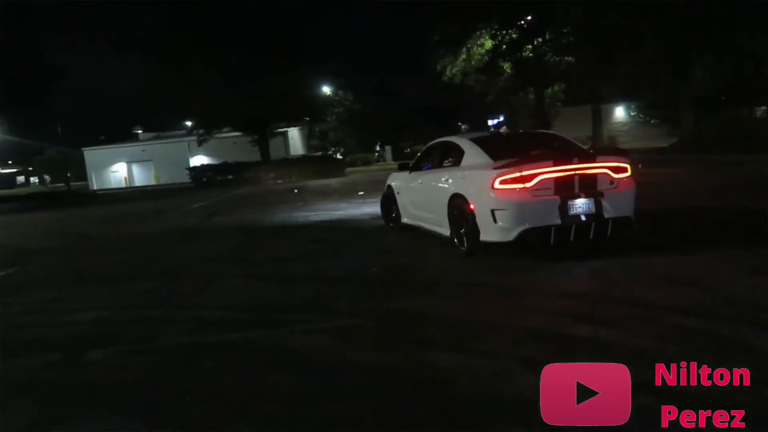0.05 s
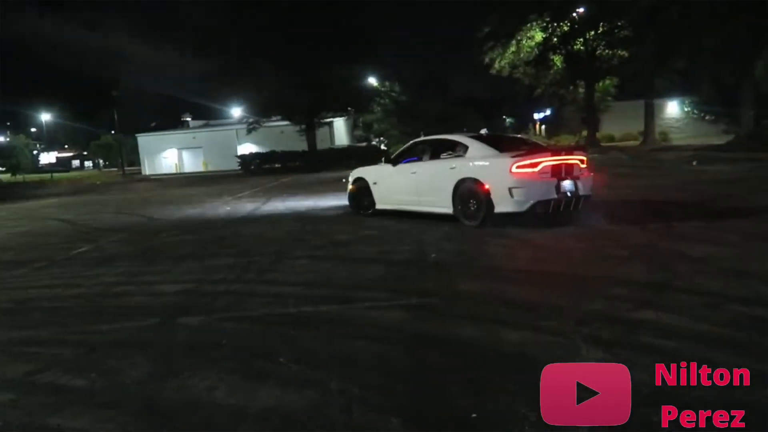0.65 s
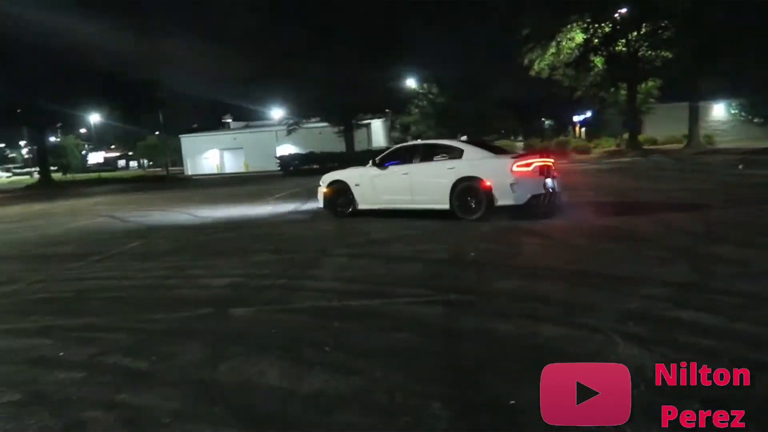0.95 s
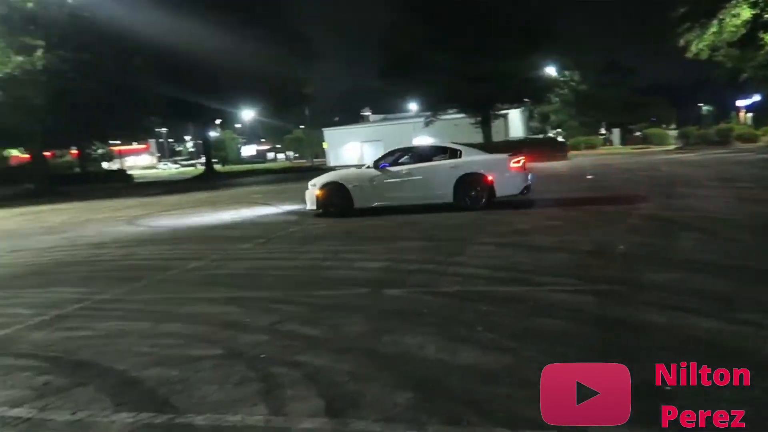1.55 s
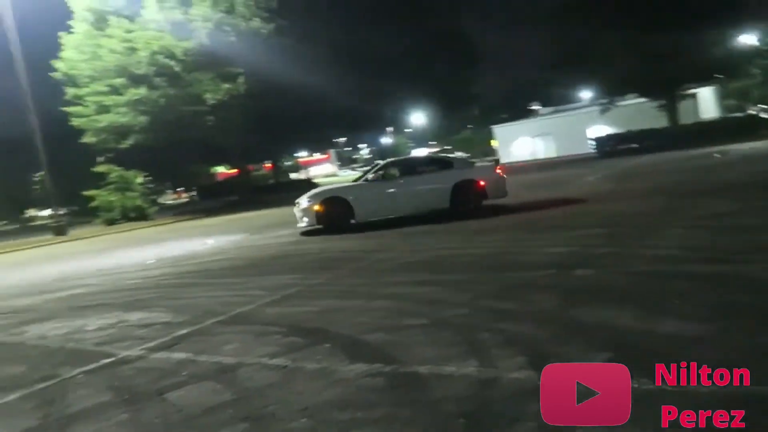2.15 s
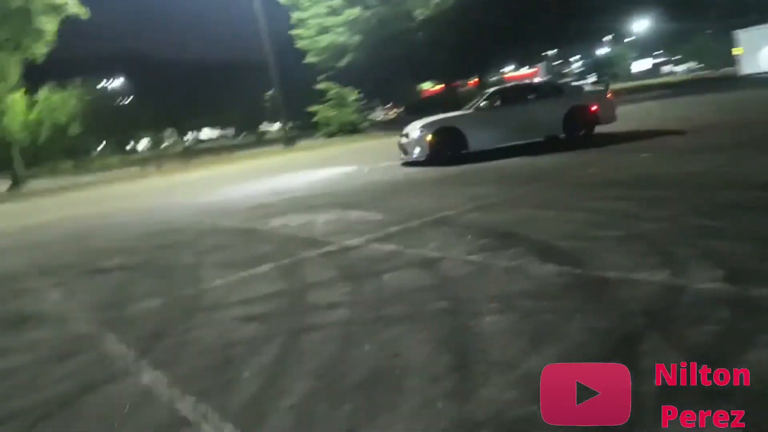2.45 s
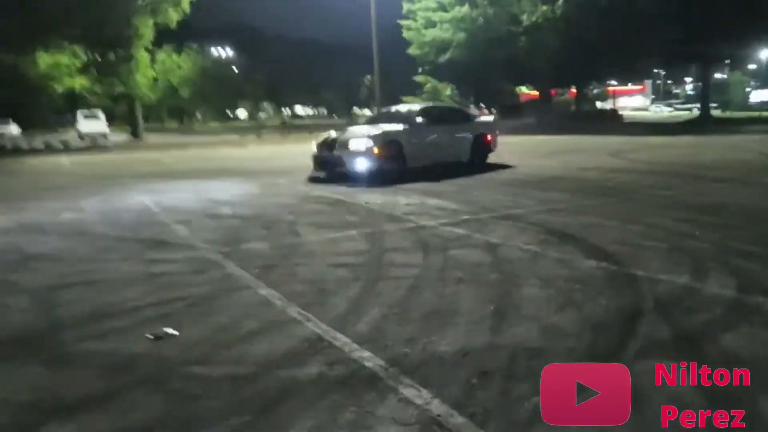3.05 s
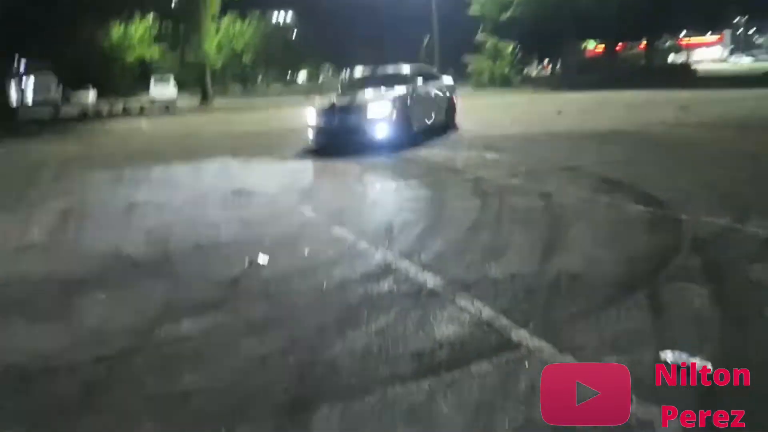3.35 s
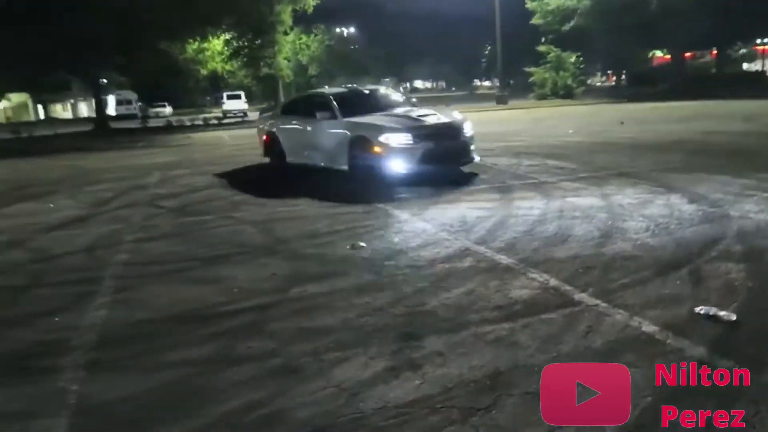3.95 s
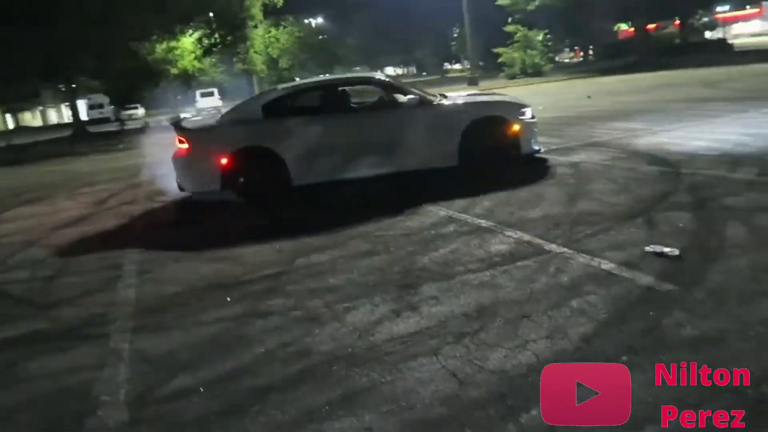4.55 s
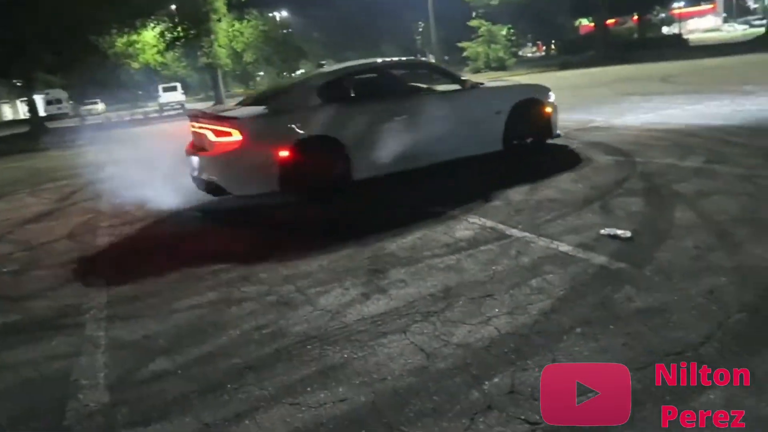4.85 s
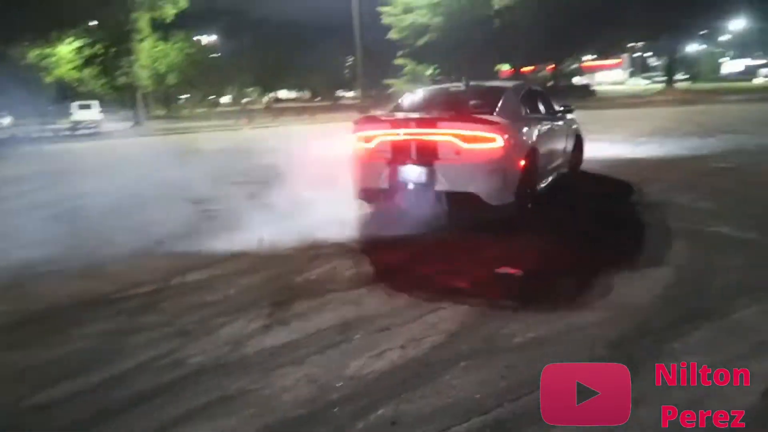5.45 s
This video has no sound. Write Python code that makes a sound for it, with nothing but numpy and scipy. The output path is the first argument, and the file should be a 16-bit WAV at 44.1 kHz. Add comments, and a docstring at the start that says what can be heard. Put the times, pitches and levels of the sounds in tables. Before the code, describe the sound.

Heard from close by in an open asphalt lot, a powerful car engine barks, drops to a low burble and surges three more times. From the second surge on, spinning tyres screech with a wavering pitch, breaking into stuttering chirps and rough rubber scrub. Near the end the tailpipes swing past, rasping and howling, then the engine eases and the squeal fades. Tight reflections and a faint night hush lie underneath.

```python
"""A V8 car spins a donut on asphalt at night, a few metres away, in four bursts of throttle.
First its uneven firing pulses ring the exhaust pipes from behind; the revs sag, then climb on the far flank.
From about 2 s the rear tyres squeal and scrub in stick-slip friction, and the nose comes round on the
third burst. On the fourth, from 3.7 s, the near flank passes, then the tail swings close by with a rasp
of gas and a howl before the throttle shuts. Throughout, buildings round the lot answer."""
import sys
import numpy as np
from scipy import signal
from scipy.fft import rfft, irfft, next_fast_len
from scipy.io import wavfile
from scipy.ndimage import uniform_filter1d, map_coordinates

SR = 44100
rng = np.random.default_rng(int(sys.argv[2]) if len(sys.argv) > 2 else 0)


def store_pcm(level_fs):
    """Save levels as 16-bit WAV."""
    pcm = np.round(np.clip(level_fs, -1, 1) * 32767).astype(np.int16)
    wavfile.write(sys.argv[1], SR, np.atleast_2d(pcm).T)


N = 246959

# level laws of the exhaust layers, before each layer's trim:
# shut_db, per_doubling_db, load_exponent, behind_db, flank_db, front_db, close_db, tail_db
BARK_LAW = (-33.5, 14.5, 1.08, -17.5, -19.7, -18.3, -17.5, -18.5)
CRACK_LAW = (-46.5, 16, 5, -34, -29, -36.5, -38, -36.5)
RASP_LAW = (-48, 20.5, 2, -22, -40.5, -40.5, -41, -40.5)
HISS_LAW = (-65, 24.5, 15, -35, -62, -54.5, -52, -59)
# the exhaust flares up, most as a tailpipe sweeps past:
# centre_s, half_length_s, bark_db, crack_db, rasp_db, hiss_db, howl_gain
FLARES = [(1.605, 0.1, 0.5, 5, 6.5, 11.5, 0), (2, 0.15, -2, 6.5, -0.5, 4, 0.044),
          (2.663, 0.057, 1, 2.5, -2, 1, 0.023), (2.897, 0.2, 0, 9, 7.5, 11.5, 0.11),
          (4.717, 0.083, 3, -4, -1, -3.5, 0.14), (4.937, 0.14, 1, 7, 19.5, 12, 0.088),
          (5.336, 0.092, 0.5, 6.5, 15, -6, 0.97)]


def exhaust(cycle, car, howl_hz=777, howl_width_hz=120, muffler_hz=440):
    """Direct and reflected sound: pulses are sharp under load, blurred when screened or off throttle."""
    _, load, angle, shares = car
    flares = sum(np.outer(rises, burst(s, half)) for s, half, *rises in FLARES)
    bark_up, crack_up, rasp_up, hiss_up, howl = flares
    screened = swell(angle, 250.7, 14.7)  # degrees at which the body hides the tailpipes
    reflected = np.clip(0.15 + 0.78 * (1 - load) + 0.63 * screened, 0, 1)
    blur = lambda x: np.sqrt(1 - reflected) * x + np.sqrt(reflected) * echoes(x)
    bark, crack, puffs = pipe_resonance(cycle, shares)
    bark += howl * filtered(bark, lambda hz: 1 / (1 + 2j * (hz - howl_hz) / howl_width_hz))
    bark = filtered(bark, lambda hz: 1 - 1 / (1 + (hz / muffler_hz) ** 6))
    bark = amp(level(BARK_LAW, car) + bark_up - 2.5 * screened - 0.5) * blur(bark)
    crack = amp(level(CRACK_LAW, car) + crack_up - 5) * blur(crack)
    flow = np.sqrt((1 - reflected) * unit(puffs + 0.58) ** 2 + reflected)
    gas = gas_jet(flow, level(RASP_LAW, car) + rasp_up, level(HISS_LAW, car) + hiss_up, shares)
    return bark + crack + gas


# the eight firings of a cycle as heard from each side: place_intervals, size_db
FIRING_BEHIND = [(7.18, 1.6), (0.59, 1.1), (1.229, -4.5), (2.007, -2.5), (2.59, 0.5), (4.14, 1.3),
                 (5.05, -14), (6.1, -7.5)]
FIRING_FLANK = [(7.57, 6), (0.865, -5), (1.96, -6), (2.69, 7), (2.8, -13), (4.62, -2.5), (5.6, -11),
                (7.5, -13)]
FIRING_FRONT = [(7.4, 2.5), (0.34, -12), (1.586, -4), (2.58, 8.5), (2.98, -14), (4.45, 0.5), (5.31, 1),
                (7.02, -5)]
FIRING_CLOSE = [(7.23, -3), (0.82, -4), (1.753, -4), (2.6, -9), (3.36, -2.5), (3.57, -0.5), (5.24, -7.5),
                (6.44, -3)]
FIRING_TAIL = [(0.05, 1), (0.94, -4.5), (1.58, -0.5), (3.18, 4.5), (4.03, -3), (4.78, -0.5), (5.64, -13.5),
               (6.58, 1.8)]
# pipe response towards each side: frequency_hz, gain_db
PIPE_BEHIND = [(250, -27), (360, -4.5), (420, -13), (490, -18.5), (570, -1), (650, -7), (750, 3.5),
               (870, -2.5), (970, 0), (1100, -12), (1600, -7.5), (2300, -23), (2850, -29.5), (3300, -22),
               (3700, -32), (5000, -32.5), (12000, -56.5)]
PIPE_FLANK = [(250, -3.5), (370, -0.5), (490, -8.5), (570, -1), (750, 1), (870, 1.5), (970, 0.5),
              (1080, -4.5), (1180, -14), (1450, 1.5), (1600, -6.5), (1920, -16.5), (2300, -9),
              (2550, -22.5), (3000, -23), (12000, -62.5)]
PIPE_FRONT = [(250, -18.5), (490, -12), (570, 1), (650, 0.5), (750, -1.5), (870, -4), (970, -8),
              (1100, -13.5), (1350, -9), (1800, -16.5), (2100, -16.5), (2500, -21.5), (3000, -22),
              (4000, -48), (7000, -46), (12000, -61)]
PIPE_CLOSE = [(250, -18.5), (420, -1), (490, -1), (570, 2), (650, -0.5), (750, -7), (870, -18), (970, -6.5),
              (1090, -3.5), (1400, -14.5), (1900, -16.5), (2400, -22.5), (3250, -21), (3800, -34),
              (5000, -40.5), (12000, -70)]
PIPE_TAIL = [(250, -18), (360, -5), (490, -1.5), (570, 4.5), (650, 2), (750, -3), (870, -8.5), (970, -11),
             (1100, -5), (1300, -11), (1600, -16.5), (2300, -22.5), (3250, -16.5), (3800, -30),
             (5000, -36.5), (12000, -61)]


def pipe_resonance(cycle, shares, split_hz=1200, puff_s=0.0017):
    """Source and filter: pulses ring the pipes in a low bark and a high crack, and drive puffs of gas."""
    patterns = FIRING_BEHIND, FIRING_FLANK, FIRING_FRONT, FIRING_CLOSE, FIRING_TAIL
    pipes = PIPE_BEHIND, PIPE_FLANK, PIPE_FRONT, PIPE_CLOSE, PIPE_TAIL
    unit_in_band = lambda x, lo, hi: x / rms(filtered(x, lambda hz: (hz > lo) & (hz < hi)))
    puff_decay = np.exp(-np.arange(SR // 40) / SR / puff_s)
    bark, crack, puffs = np.zeros((3, N))
    for weight, pattern, pipe in zip(np.sqrt(shares), patterns, pipes):
        pulses = firings(cycle, pattern, scatter_db=1.2, jitter=0.009)
        # dispersion: the pipe delays the bass of each pulse behind its treble
        tone = signal.lfilter([-.88, 1], [1, -.88], ring(pulses, pipe))
        body = filtered(tone, lambda hz: 1 / (1 + (hz / split_hz) ** 8))
        bark += weight * unit_in_band(body, 480, 780)
        crack += weight * unit_in_band(tone - body, 1300, 1600)
        # the hardest pulses tear off far more noise
        puffs += weight * unit(signal.fftconvolve(pulses ** 2, puff_decay)[:N])
    return bark, crack, puffs


def firings(cycle, pattern, scatter_db, jitter):
    """Cycle-to-cycle variation: one pressure pulse per firing, each a little off in size and time."""
    place, db = np.transpose(pattern)
    chance = rng.standard_normal((SR // 200, len(place), 2))
    due = np.arange(len(chance))[:, None] + (place + jitter * chance[..., 0]) / len(place)
    at = np.interp(due.ravel(), cycle, np.arange(N))
    size = amp(db + scatter_db * chance[..., 1]).ravel() * (at < N - 1)
    first, part = at.astype(int), at % 1  # each pulse is shared between two samples
    return (np.bincount(first, size * (1 - part), N + 1) + np.bincount(first + 1, size * part, N + 1))[:N]


# gas noise at the pipe mouths and low rumble of the jet: frequency_hz, density_db
RASP_SPECTRUM = [(900, -35), (1800, -4.5), (2500, -5), (2900, -2.5), (3250, -3), (3550, -7), (3850, -5),
                 (4400, -14), (6500, -22), (10000, -51)]
HISS_SPECTRUM = [(2500, -20), (4500, 2.5), (6200, 1.5), (8000, -3), (12000, -9.5), (13500, -32),
                 (15500, -47)]
RUMBLE_SPECTRUM = [(20, 10), (50, 8), (75, 9), (120, 8.5), (250, 5), (600, -43)]


def gas_jet(flow, rasp_db, hiss_db, shares, spacing_hz=256, bounce=0.18, tip_hz=3320):
    """Turbulence: pulsing gas noise bounces in the open pipe, which rings at evenly spaced pitches."""
    gas = flow * (amp(rasp_db - 3) * noise(RASP_SPECTRUM) + amp(hiss_db + 1) * noise(HISS_SPECTRUM))
    gas = filtered(gas, lambda hz: 1 / (1 - bounce * np.exp(-2j * np.pi * hz / spacing_hz)))
    # the steel tips and the jet are heard most when they point at the listener
    behind, _, _, close, tail = shares
    tips = unit(filtered(flow * rng.standard_normal(N), lambda hz: 1 / (1 + ((hz - tip_hz) / 170) ** 2)))
    tips *= amp(rasp_db - 5) * (behind + 0.66 * (close + tail))
    rumble = amp(hiss_db - 7.5 + 3.9 * behind) * noise(RUMBLE_SPECTRUM)
    return gas + tips + rumble


# level laws of orders 3, 5, 8 and the weaker ones, ahead of the mufflers: columns as in BARK_LAW
THIRD_LAW = (-48.5, 15.5, 3, -49, -39.5, -31, -45.5, -51)
FIFTH_LAW = (-39, 20.5, 1, -35.5, -31, -28, -26, -30)
EIGHTH_LAW = (-44.5, 16, 1.6, -32, -29.5, -29.5, -34, -43.5)
WEAK_LAW = (-45, 23.5, 0.3, -27, -32.5, -34, -28, -27)
# weaker orders against their law: order, behind_db, flank_db, front_db, close_db, tail_db
WEAK_ORDERS = [(4, -21, -24, -17, -14.5, -18.5), (6, -15.5, -6.5, -8.5, -14, -10),
               (7, -12, -10.5, -21, -18.5, -6.5), (9, -2.5, -3, -7.5, -2, -4),
               (10, -9.5, -5, -7, -14.5, -14), (11, -16, -2, -6.5, -9, -4)]
# single orders sing out in the pipes as the car turns:
# order, centre_s, half_length_s, level_db (at the peak, before the trim)
SINGING_ORDERS = [(16, 1.365, 0.16, -28), (11, 1.54, 0.082, -39), (24, 1.6, .17, -28),
                  (18, 2.82, 0.085, -25.5), (19, 3.93, .15, -24.5), (20, 3.6, 0.13, -29),
                  (17, 4.32, 0.15, -21), (17, 4.3, 0.15, -24.5), (19, 4.83, .08, -22),
                  (16, 5.29, 0.083, -20.5), (17, 5.45, 0.049, -20.5), (21, 5.4, 0.13, -24.5),
                  (16, 0.13, 0.31, -20)]
# muffler response: frequency_hz, gain_db
MUFFLER = [(75, 1), (105, -14), (128, -9), (150, -6.5), (176, -4), (198, 0), (235, -3), (256, 2.5),
           (287, 4), (318, 1), (365, -0.5), (410, 2), (455, -1)]


def muffler_drone(cycle, car, hollow_hz=372):
    """Forced resonance: orders, the multiples of the cycle rate, boom as they pass the mufflers' notes."""
    cycle_hz, _, _, shares = car
    place, size_db = np.transpose(FIRING_FLANK)

    def order(k, db, waver_db=1.5):
        """Harmonic k, slightly unsteady, takes its phase from the firing pattern."""
        lead = np.angle(np.sum(amp(size_db) * np.exp(-2j * np.pi * k * place / len(place))))
        gain = amp(db + along(MUFFLER, k * cycle_hz) + waver_db * wobble(14))
        return np.sqrt(2) * gain * np.cos(2 * np.pi * k * cycle + lead + 0.16 * wobble(25))

    # the uneven banks favour the fifth
    boom = sum(order(k, level(law, car)) for k, law in ((3, THIRD_LAW), (5, FIFTH_LAW), (8, EIGHTH_LAW)))
    weak_db = level(WEAK_LAW, car)
    for k, *side_db in WEAK_ORDERS:
        boom += order(k, weak_db + np.array(side_db) @ shares, waver_db=3)
    for k, s, half, db in SINGING_ORDERS:
        boom += amp(db + 1.5) * burst(s, half) * np.cos(2 * np.pi * k * cycle)
    for k in range(12, 18):  # at low revs these sweep through the muffler's hollow note
        boom += order(k, weak_db - 2.5, waver_db=4) / (1 + ((k * cycle_hz - hollow_hz) / 30) ** 2)
    return boom + amp(-31) * echoes(boom)


# colour of the snap: frequency_hz, gain_db
SNAP_SPECTRUM = [(600, -34), (1400, 4), (1900, -0.5), (2600, -5.5), (4500, -11), (9000, -33.5)]


def exhaust_snap(cycle, car, place=0.275, level_db=-34.5):
    """Directivity: from straight behind, under load, one firing a cycle arrives as a hard, thin crack."""
    _, load, _, shares = car
    shocks = firings(cycle, [(place, 0)], scatter_db=2, jitter=0.006)
    return amp(level_db) * load ** 4 * shares[0] * unit(ring(shocks, SNAP_SPECTRUM))


# engine speed in four-stroke cycles: time_s, cycle_hz
ENGINE_SPEED = [(0.0, 39.98), (0.2, 41.78), (0.31, 42.21), (0.5, 40.06), (0.6, 38.21), (0.93, 25.43),
                (1.15, 22.27), (1.32, 24.26), (1.5, 28.75), (1.68, 32.92), (1.78, 33.88), (1.92, 35.19),
                (2.07, 36.88), (2.35, 30.82), (2.52, 29.58), (2.72, 37.1), (2.94, 45.51), (3.1, 47.29),
                (3.33, 45.41), (3.69, 35.57), (4.01, 39.92), (4.23, 39.7), (4.52, 36.18), (4.7, 34.31),
                (4.8, 36.51), (5.0, 41.58), (5.09, 40.63), (5.23, 38.26), (5.42, 38.6), (5.6, 34.77)]
# bursts of throttle: open_s, rise_s, shut_s, fall_s
THROTTLE = [(-0.4, 0.3, 0.52, 0.2), (1.12, 0.32, 2.076, 0.22), (2.43, 0.17, 2.87, 0.27),
            (3.68, 0.11, 5.445, 0.33)]
# the car's turn, from 0 with its tail to the listener: time_s, angle_deg
TURN = [(0, -1.5), (0.55, 19.5), (1.15, 81.5), (2.1, 93), (2.55, 177), (3.25, 183.5), (3.8, 241),
        (4.3, 258.5), (4.65, 271.5), (5.08, 269.5), (5.24, 332), (5.6, 334)]
# where each side is heard (behind, far flank, front, close flank, tail close by): angle_deg
SIDE_ANGLES = [0, 90, 180, 270, 330]


def driving(scattered_share=0.01):
    """A rotating directional source: engine speed, load 0-1, angle and the share heard of each side."""
    t = np.arange(N) / SR
    load = sum(np.clip(np.minimum((t - opens) / rise, 1 - (t - shuts) / fall), 0, 1)
               for opens, rise, shuts, fall in THROTTLE)
    load = np.clip(uniform_filter1d(load, size=SR // 14), 0, 1)
    cycle_hz, = curves(ENGINE_SPEED)
    angle, = curves(TURN)
    facing = np.array([np.interp(angle, SIDE_ANGLES, side) for side in np.eye(len(SIDE_ANGLES))])
    shares = facing + scattered_share
    return cycle_hz, load, angle, shares / shares.sum(0)


def level(law, car, cruise_hz=36):
    """Level law in dB: it follows engine speed with the throttle shut, the side heard with it open."""
    cycle_hz, load, _, shares = car
    shut_db, per_doubling_db, load_exponent, *open_db = law
    push = load ** load_exponent
    coasting_db = shut_db + per_doubling_db * np.log2(cycle_hz / cruise_hz)
    return (1 - push) * coasting_db + push * (np.array(open_db) @ shares)


# sliding rear tyres: time_s, pitch_hz, squeal_db, second_mode_relative_db, scrub_db
SQUEAL = [(1.9, 998, -66, -12, -57), (2.17, 947.3, -30, -12, -40.5), (2.3, 957, -36, -10, -38),
          (2.5, 931.6, -29, -7, -33), (3.05, 836.6, -31, -13, -31.5), (3.3, 863, -28, -11.5, -31.5),
          (3.89, 794, -28.5, -11.5, -31.5), (3.91, 1041, -26, -10, -24), (4.2, 1039, -25.5, -5.5, -25.5),
          (4.58, 965, -26.5, -10, -27.5), (4.85, 1041, -32, -18, -26.5), (5.1, 1081, -22, -18, -28),
          (5.3, 1050, -29, -18, -35), (5.6, 1000, -53, -4, -48)]
# the tyres lose their grip and fall quiet: centre_s, half_length_s, change_db
GRIP_LOSSES = [(4.325, 0.028, -9.5), (4.58, 0.026, -26)]
# tearing rubber: frequency_hz, density_db
SCRUB_SPECTRUM = [(150, -21), (400, -22), (900, 8), (1250, 2), (2200, -3), (4000, -16), (9000, -40.5)]


def tyre_squeal(wander=0.036, flutter=0.0222, spread=0.042, second_ratio=1.91, upper_hz=1260):
    """Stick-slip oscillation: tread patches slip at their own unsteady pitches, over a rubber scrub."""
    pitch, db, second_db, scrub_db = curves(SQUEAL)
    squeal = np.zeros(N)
    for ratio in (1 - spread, 1, 1 + spread):
        phase = phase_of(pitch * ratio * (1 + wander * wobble(45) + flutter * wobble(300)))
        squeal += amp(4.5 * wobble(40)) * np.sin(phase)
    # the second mode is a rough band of noise round a moving pitch
    phase = phase_of(second_ratio * pitch)
    second = unit(wobble(220) * np.cos(phase) + wobble(220) * np.sin(phase))
    squeal = unit(squeal) + amp(second_db) * second
    # a higher tread mode joins in while the squeal is low
    upper = np.sin(phase_of(upper_hz * (1 + 0.0386 * wobble(200) + 0.045 * wobble(30))))
    squeal = unit(squeal) + amp(-1) * upper * np.clip((950 - pitch) / 100, 0, 1)
    scrub = unit(noise(SCRUB_SPECTRUM) * amp(2.5 * wobble(70)))
    squeal = unit(squeal + amp(-2.5) * echoes(squeal))
    dip_db = sum(change_db * burst(s, half) for s, half, change_db in GRIP_LOSSES)
    return amp(dip_db) * (amp(db) * squeal + amp(scrub_db) * scrub)


# the tread bites: centre_s, half_length_s, pitch_hz, level_db, upper_mode_hz, upper_mode_db
CHIRPS = [(2.423, 0.05, 930, -30, 1803, -50), (3.185, .025, 826, -24.5, 1740, -47),
          (3.306, 0.051, 876, -25, 1910, -44), (3.452, 0.03, 825, -24, 1820, -36.5),
          (3.596, 0.04, 800, -31, 1740, -41), (3.768, 0.023, 812, -19, 1710, -33),
          (3.858, 0.048, 812, -21, 1671, -23.5), (3.92, 0.014, 1092, -15.5, 1720, -35),
          (4.028, 0.03, 1030, -19, 1940, -29.5), (4.142, 0.046, 1084, -30, 2064, -31),
          (4.24, 0.044, 1077, -21, 2020, -27.5), (4.433, 0.033, 941, -20.5, 1927, -29.5),
          (4.508, 0.044, 985, -17, 1880, -40), (4.641, 0.037, 932, -22.5, 1990, -28)]
# rasp of the biting tread: frequency_hz, density_db
TREAD_SPECTRUM = [(900, -31), (1500, 2), (2000, 2.5), (2400, -3.5), (2800, 3), (3800, -6), (4300, -16.5),
                  (9000, -35)]


def tyre_chirps(wander=0.01794, flutter=0.0309, rough_db=3, rasp_db=-5):
    """Transient friction: each bite of the tread excites a low mode, a broad upper one and a rasp."""
    t = np.arange(N) / SR
    phase_per_hz = phase_of(1 + wander * wobble(70) + flutter * wobble(450))
    smear = unit(wobble(250)), unit(wobble(250))
    low, upper, bite = np.zeros((3, N))
    for s, half, hz, db, upper_hz, upper_db in CHIRPS:
        envelope, phase = burst(s, half), 2 * np.pi * upper_hz * t
        low += envelope * amp(db) * np.sqrt(2) * np.sin(hz * phase_per_hz)
        upper += envelope * amp(upper_db) * (smear[0] * np.cos(phase) + smear[1] * np.sin(phase))
        bite += envelope * amp(upper_db)
    rasp = amp(rasp_db) * bite * noise(TREAD_SPECTRUM)
    chirps = (low + upper + rasp) * unit(amp(rough_db * wobble(220)))
    return chirps + amp(-9) * echoes(chirps)


# reverberation time between the buildings: frequency_hz, t60_s
LOT_DECAY = [(200, 0.24), (1000, 0.33), (4000, 0.24), (12000, .2)]


def echoes(x):
    """Diffuse reverberation: the lot's answer, as loud as x; the treble dies first."""
    hz, t, spectra = signal.stft(rng.standard_normal(SR // 2), SR, nperseg=256)
    tail = signal.istft(spectra * amp(-60 * t / along(LOT_DECAY, hz)[:, None]), SR)[1]
    return unit(signal.fftconvolve(x, tail)[:N]) * rms(x)


# night air over the lot: frequency_hz, density_db
AIR_SPECTRUM = [(25, -18), (60, -16), (120, -14), (300, 10.5), (900, -5), (1500, -11.5), (4000, -23.5),
                (8000, -39), (14000, -53.5)]


def night_air(level_db=-37.5):
    """Ambient noise: a steady, low hush."""
    return amp(level_db) * noise(AIR_SPECTRUM)


def amp(db):
    """Decibels to gain."""
    return 10 ** (np.asarray(db) / 20)


def rms(x):
    """Root mean square."""
    return np.sqrt(np.mean(x ** 2) + 1e-20)


def unit(x):
    """Normalisation to rms 1."""
    return x / rms(x)


def along(points, hz):
    """Interpolation of (frequency_hz, value) points on a log axis."""
    f, v = np.transpose(points)
    return np.interp(np.log(hz + 1), np.log(f + 1), v)


def curves(rows):
    """Linear interpolation: one value per sample for each column after the time."""
    s, *cols = np.transpose(rows)
    return [np.interp(np.arange(N) / SR, s, c) for c in cols]


def swell(x, centre, half_width):
    """A Gaussian rise to 1 round the centre."""
    return np.exp(-((x - centre) / half_width) ** 2)


def burst(centre_s, half_length_s):
    """A Gaussian envelope in time."""
    return swell(np.arange(N) / SR, centre_s, half_length_s)


def phase_of(hz):
    """Phase as the integral of frequency."""
    return 2 * np.pi * np.cumsum(hz) / SR


def wobble(rate):
    """Smooth random modulation, rate knots a second."""
    return map_coordinates(rng.standard_normal(int(N * rate / SR) + 4), [np.arange(N) * rate / SR])


def filtered(x, response):
    """Linear filtering: the spectrum of x times a frequency response."""
    m = next_fast_len(N + SR // 4)
    return irfft(rfft(x, m) * response(np.fft.rfftfreq(m, 1 / SR)), m)[..., :N]


def noise(spectrum):
    """Coloured noise of rms 1."""
    return unit(filtered(rng.standard_normal(N), lambda hz: amp(along(spectrum, hz))))


def ring(x, spectrum, size=4096):
    """Minimum-phase filtering: x through a causal body with this colour."""
    cepstrum = irfft(np.log(amp(along(spectrum, np.fft.rfftfreq(size, 1 / SR)))))
    cepstrum[1:size // 2] *= 2
    cepstrum[size // 2 + 1:] = 0
    return signal.fftconvolve(x, irfft(np.exp(rfft(cepstrum))))[:N]


# stereo width: frequency_hz, side_against_mid_db
STEREO_WIDTH = [(100, -56), (500, -97), (1400, -40.5), (2800, -30.5), (5000, -10.5), (9000, -1),
                (13000, 0.5)]


def scene():
    """Superposition: car and air sum at two close microphone ports, which differ only in the treble."""
    car = driving()
    cycle = np.cumsum(car[0]) / SR  # engine cycles completed
    engine = muffler_drone(cycle, car) + exhaust(cycle, car) + exhaust_snap(cycle, car)
    mid = engine + tyre_squeal() + tyre_chirps() + night_air()
    side = filtered(mid * wobble(400), lambda hz: amp(along(STEREO_WIDTH, hz)))
    return np.array([mid + side, mid - side])


def record(dry, ceiling=0.81, low_cut_hz=72, top_hz=15350):
    """Saturation and band limiting: peaks are rounded, the deep bass thinned and the top treble cut."""
    rounded = dry / (1 + (dry / ceiling) ** 6) ** (1 / 6)
    return filtered(rounded, lambda hz: (hz < top_hz) * (.25 + .75 / (1 + (low_cut_hz / (hz + 1)) ** 6)))


dry = scene()
out = record(dry)
store_pcm(out)
```